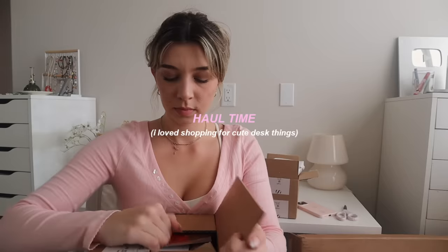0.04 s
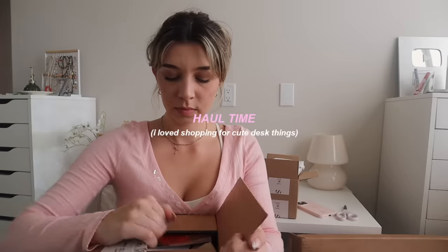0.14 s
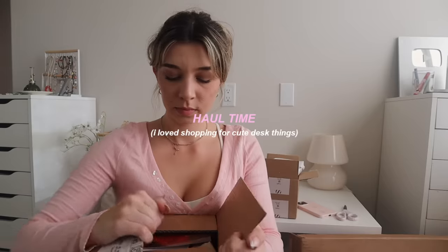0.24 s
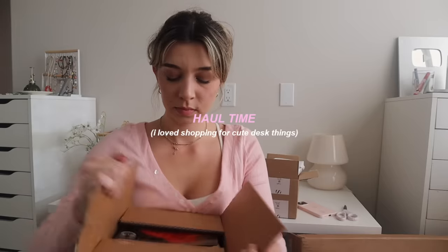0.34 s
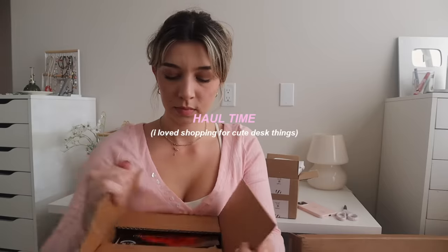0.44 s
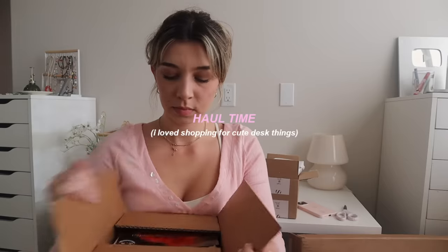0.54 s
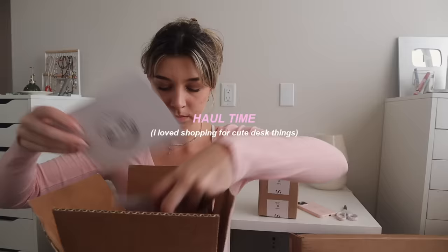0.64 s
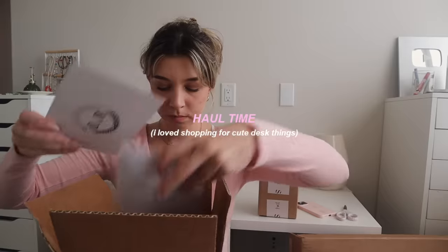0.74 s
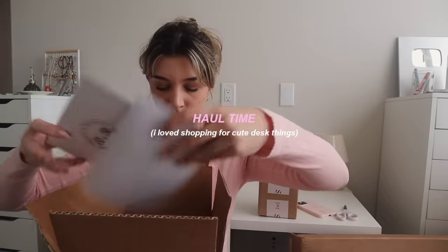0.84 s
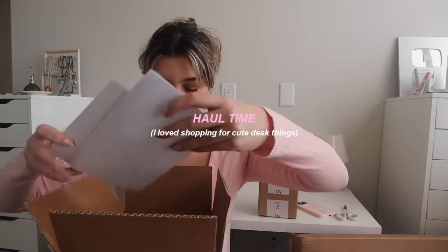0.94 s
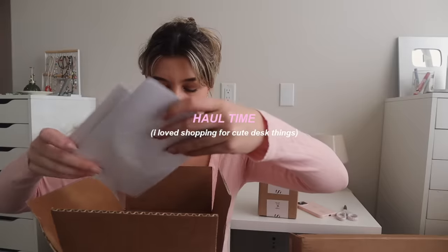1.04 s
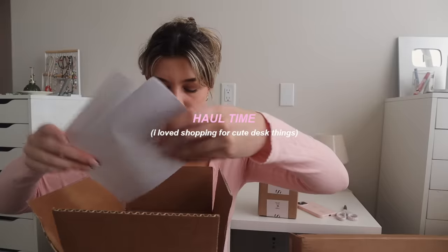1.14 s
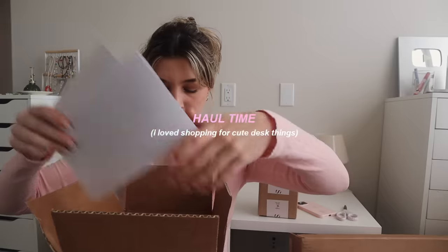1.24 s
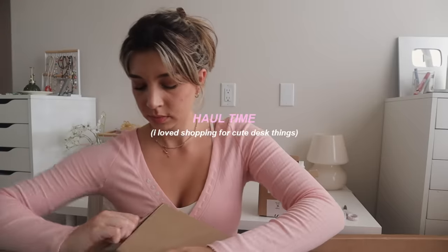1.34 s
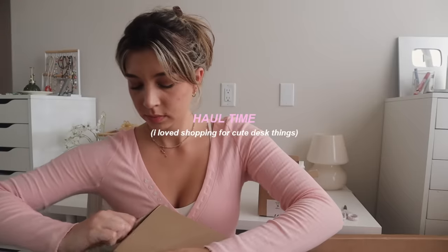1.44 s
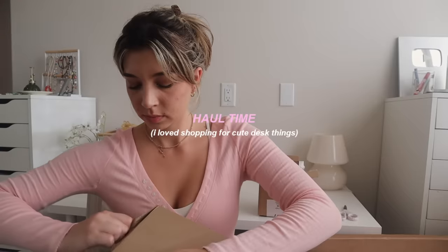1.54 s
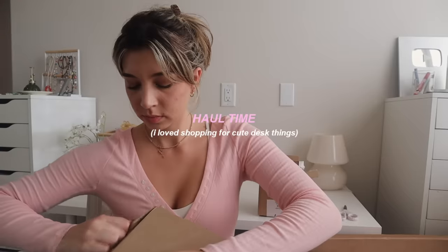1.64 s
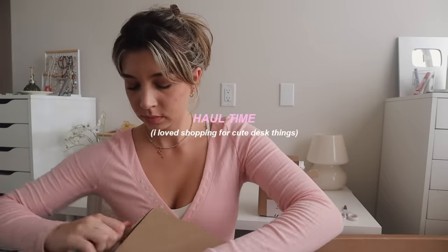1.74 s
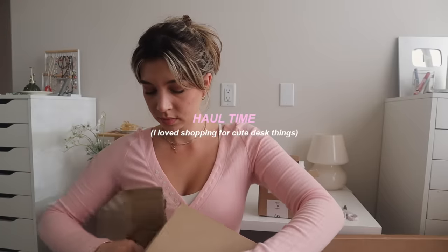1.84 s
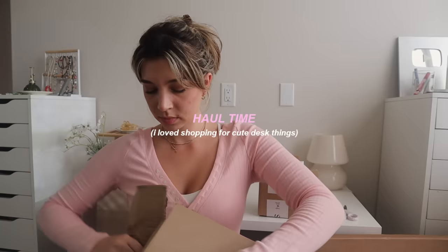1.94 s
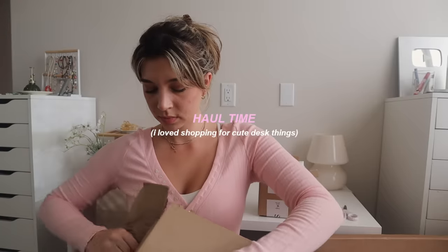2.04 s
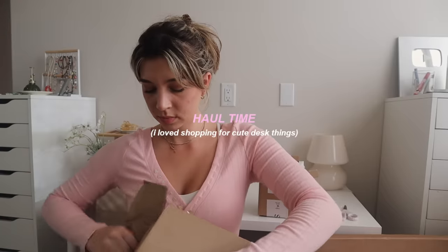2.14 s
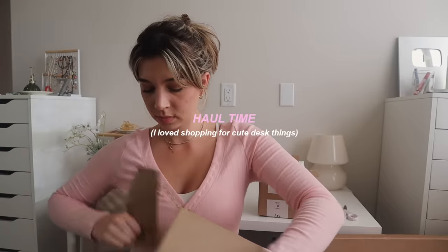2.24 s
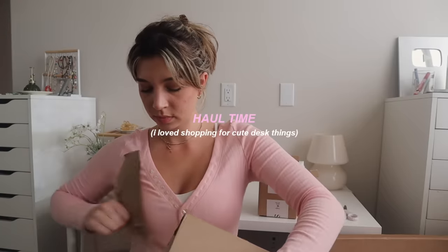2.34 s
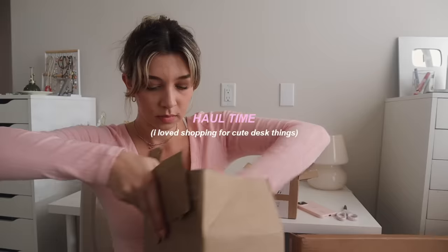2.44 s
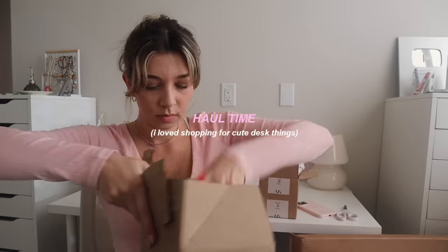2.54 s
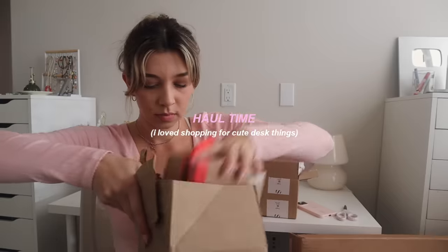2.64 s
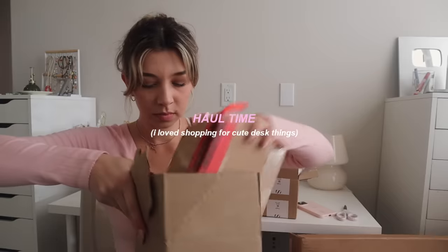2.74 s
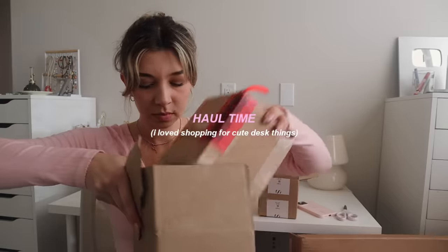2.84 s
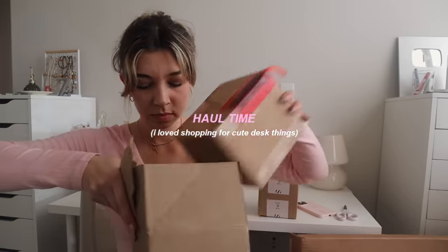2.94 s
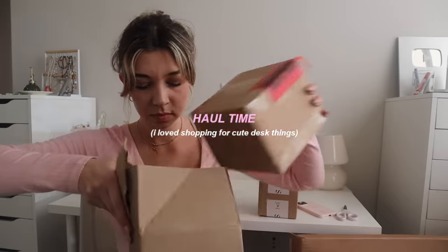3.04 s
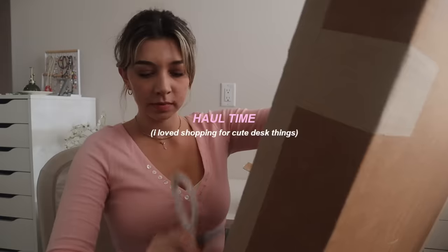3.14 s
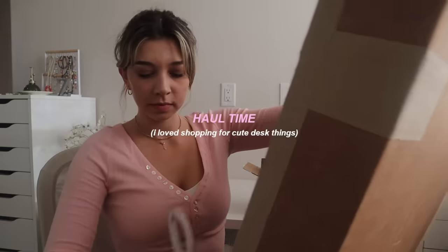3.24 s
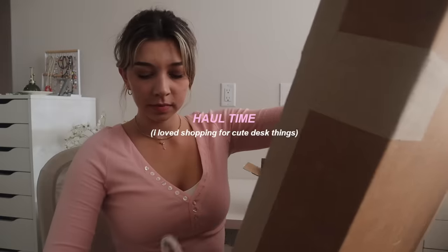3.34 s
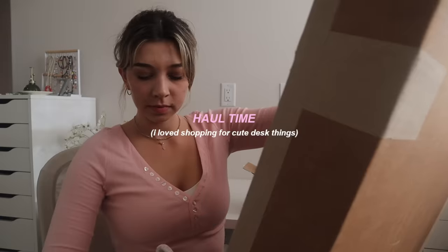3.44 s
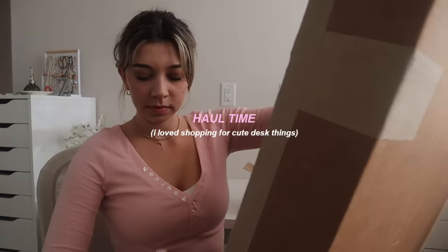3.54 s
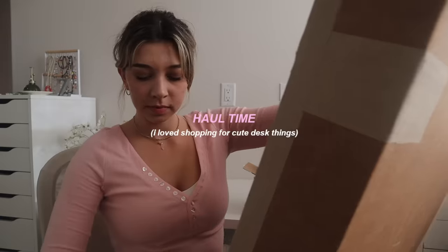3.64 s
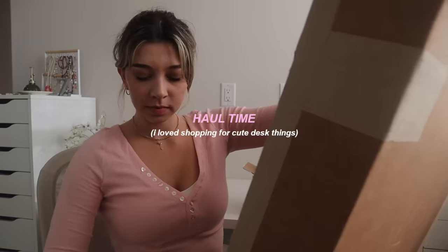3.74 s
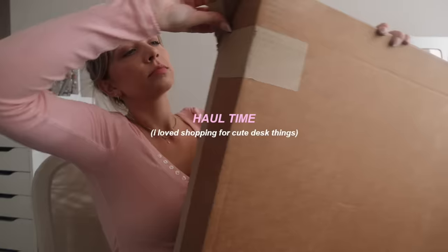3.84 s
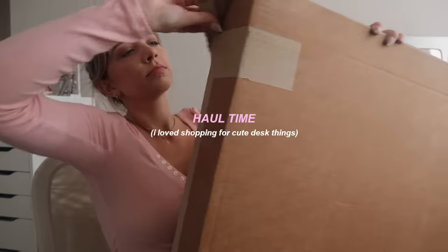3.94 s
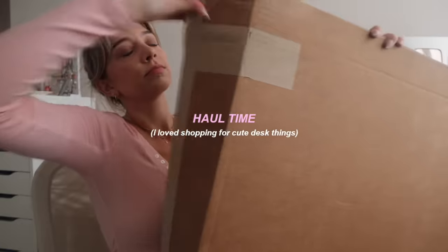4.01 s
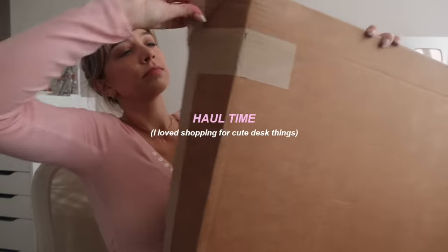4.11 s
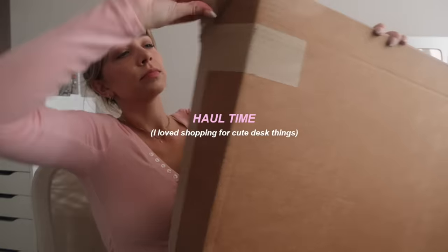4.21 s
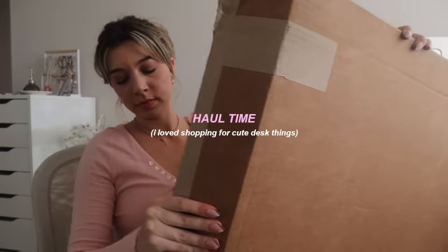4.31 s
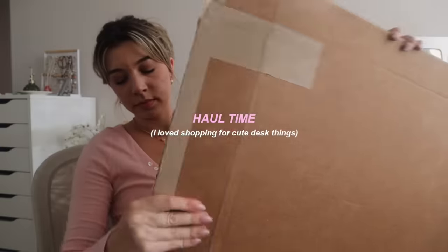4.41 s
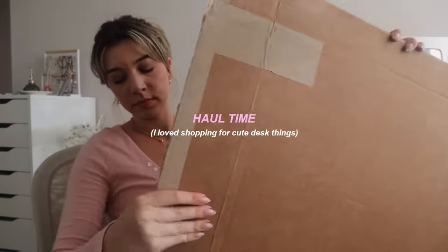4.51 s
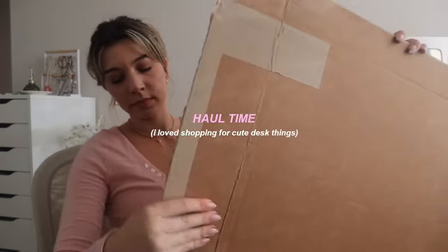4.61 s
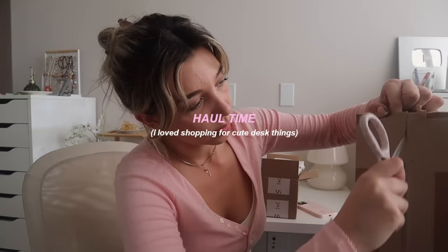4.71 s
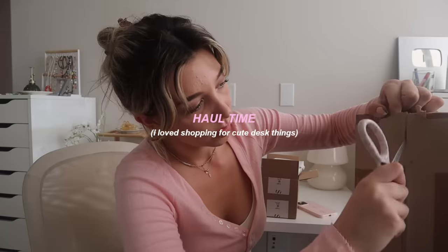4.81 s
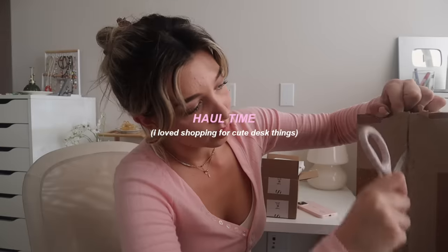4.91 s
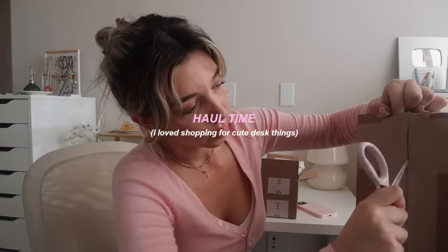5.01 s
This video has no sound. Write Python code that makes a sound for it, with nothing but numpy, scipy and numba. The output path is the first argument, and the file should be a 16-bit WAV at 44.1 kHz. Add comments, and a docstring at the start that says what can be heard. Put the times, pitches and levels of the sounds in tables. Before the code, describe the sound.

Cardboard boxes are knocked, scraped and dragged close to the microphone in a small room, with crackling tape and hard hollow thumps.

```python
"""Cardboard boxes are handled in a small room, close to a stereo microphone, over a steady hush.
Paper is lifted out, a flap is dragged open and a carton is drawn out; a big box slides up on the right,
hands crackle on taped board, and the box is turned round. Edges scrape in dense stick-slip grains, while
knocks ring panel modes, presses boom on two low modes and creases snap in short noise bursts.
A limiter ducks on the hardest knocks, so the room's ring seems to hang on after them."""
import sys
import numpy as np
from scipy import signal
from scipy.fft import rfft, irfft, next_fast_len
from scipy.io import wavfile
from scipy.ndimage import uniform_filter1d
from numba import njit

SR = 44100
rng = np.random.default_rng(int(sys.argv[2]) if len(sys.argv) > 2 else 0)


def digitize_waveform(pressure):
    """Quantize a signal to 16-bit integers and store it at the path in sys.argv[1].

    Rows of a 2-D input are taken as channels; values are limited to [-1, 1].
    """
    field = np.atleast_2d(pressure).T
    bounded = np.clip(field, -1, 1)
    quanta = np.round(bounded * 32767).astype(np.int16)
    wavfile.write(sys.argv[1], SR, quanta)


N = 223651
FFT_SIZE = next_fast_len(N, True)


def undb(db):
    """Decibels to amplitude gain."""
    return 10 ** (np.asarray(db) / 20)


def unit(x):
    """Scale to rms 1."""
    return x / np.sqrt(np.mean(x ** 2))


def on_bins(points, size=FFT_SIZE):
    """Read (frequency [Hz], value) points at every bin of a spectrum, along log frequency."""
    hz, value = np.transpose(points)
    bin_hz = np.fft.rfftfreq(size, 1 / SR) + 1  # 1 Hz up, to keep the log finite
    return np.interp(np.log(bin_hz), np.log(hz), value)


def colour(x, gain):
    """Filter by a gain for every bin."""
    return irfft(rfft(x, FFT_SIZE) * gain, FFT_SIZE)[..., :N]


def walk(rate):
    """Random wander with a spread near 1: straight lines between `rate` random points a second."""
    knots = rng.standard_normal(8192)
    return np.sqrt(1.5) * np.interp(np.arange(N) / SR * rate, np.arange(len(knots)), knots)


def add(track, s, sound):
    """Mix a sound in at time s [s]."""
    i = max(int(s * SR), 0)
    track[:, i:i + sound.shape[-1]] += sound[..., :N - i]


# Colour of the still air: (frequency [Hz], relative level [dB])
HUSH_TONE = [(15, -38), (25, -14.5), (307, -13), (1180, -25), (1410, -25.5), (9100, -38.5), (10900, -32),
             (12100, -82), (22000, -120)]


def hush(level_db=-45):
    """Still air of the room: quiet, steady coloured noise."""
    noise = colour(rng.standard_normal((2, N)), undb(on_bins(HUSH_TONE)))
    return undb(level_db) * unit(noise)


# Reverberation: (frequency [Hz], time to fall by 60 dB [s])
ROOM_DECAY = [(100, 0.31), (400, 0.34), (1500, 0.4), (5000, 0.45), (12000, 0.37)]
# Colour of the reflections; furnishings soak up the treble: (frequency [Hz], relative level [dB])
REFLECTION_TONE = [(70, 6), (200, 4.5), (1000, 6), (2000, 1), (3000, 0), (9000, -1)]


def room(x, wet_db):
    """Direct sound plus diffuse reflections, unrelated in mid and side, each band with its own decay."""
    t = np.arange(SR * 3 // 5) / SR
    noise = rfft(rng.standard_normal((2, len(t)))) * undb(on_bins(REFLECTION_TONE, len(t)))
    hz, t60 = np.transpose(ROOM_DECAY)
    tail = 0
    for share, decay in zip(np.eye(len(hz)), t60):
        band = irfft(noise * on_bins(np.c_[hz, share], len(t)), len(t))
        tail = tail + band * np.exp(-np.log(1000) * t / decay)
    tail = tail * np.clip((t - .002) / 0.00077, 0, 1)  # the nearest surfaces answer after 2 ms
    tail = tail / np.sqrt(np.sum(tail[0] ** 2))
    return x + undb(wet_db) * signal.fftconvolve(x, tail, axes=1)[:, :N]


# Presses on a hollow box:
# (time [s], peak before the room [dB], settled note [Hz], second mode against the first [dB])
PRESSES = [(.334, -4.5, 163.6, -10), (2.608, -20, 129, -7), (2.724, -16.5, 160, -5.5),
           (2.7365, -21.5, 153, -17), (2.914, -23.5, 135, -13), (4.384, -10, 102, -12),
           (4.396, -6, 263.5, -9), (4.741, -7.5, 202, -27), (4.802, -19, 100, -7), (4.953, -12, 203, -25)]


def booms(swell_s=0.0012, bend=0.057, relax_s=0.022, mode_ratio=2.3, t60_s=0.13):
    """Pressing on a hollow box sets its face swinging on two low modes that sink as it relaxes."""
    out, t = np.zeros((2, N)), np.arange(SR // 3) / SR
    for s, peak_db, note_hz, second_db in PRESSES:
        hz = note_hz * (1 + bend * np.exp(-t / relax_s))  # starts sharp by a share of its note
        phase = 2 * np.pi * np.cumsum(hz) / SR
        modes = np.exp(1j * phase) + undb(second_db) * np.exp(1j * mode_ratio * phase)
        swing = modes * (1 - np.exp(-t / swell_s)) * np.exp(-np.log(1000) * t / t60_s)
        add(out, s, undb(peak_db) * np.array([swing.imag, swing.real]) / np.abs(swing).max())
    return room(out, wet_db=-4.5)


def snap(level_db, hz, decay_ms, octaves):
    """Fibres give way in a burst of a few milliseconds, spread evenly over its band."""
    t = np.arange(SR // 25) / SR
    edges = [hz / 2 ** (octaves / 2), min(hz * 2 ** (octaves / 2), .45 * SR)]
    fade = np.exp(-t * 1000 / decay_ms)
    spectrum = rfft(rng.standard_normal((2, len(t))) * fade)
    even = irfft(np.exp(1j * np.angle(spectrum)), len(t))  # keep the phases, flatten the spectrum
    burst = signal.lfilter(*signal.butter(2, edges, "band", fs=SR), even * fade ** .25)
    # equal energy for equal level and decay, however wide the band
    return .5 * undb(level_db) * burst * np.linalg.norm(fade) / np.linalg.norm(burst, axis=1, keepdims=True)


# Snaps of creases, paper and fingernails:
# (time [s], relative level [dB], centre [Hz], nominal decay constant [ms], width [octaves])
CREASES = [(0.3288, 10.5, 1380, 1.4, 1.5), (0.3279, 11.5, 5200, 1.44, 2.2), (.826, -17, 1750, 2, .5),
           (.854, -28, 3960, 3, 2.5), (.9304, -1.5, 2310, 0.72, 3.16), (1.128, -14, 1350, 3.7, 2.1),
           (1.3317, -4.5, 4200, 1.07, 3.2), (1.891, -19, 1830, 5.9, 1.7), (1.905, -1.5, 1280, 1.2, 2),
           (1.932, -9.5, 1210, 2.6, 0.58), (4.0155, 8, 1680, 3.7, 0.66), (4.04, 10.5, 2870, 1.2, 1.5),
           (4.383, 0.5, 1790, 1.04, 2.84), (4.733, -14, 3180, 4.5, 1.04), (4.95, -16, 4000, 8.8, 2.5),
           (4.984, -4, 2180, 1.8, 1.95)]


def snaps():
    """Creases give way; stiff card rings in a narrow band, paper in a wide one."""
    out = np.zeros((2, N))
    for s, level_db, hz, decay_ms, octaves in CREASES:
        add(out, s, snap(level_db, hz, decay_ms, octaves))
    return room(out, wet_db=-5.0)


# Modes of a box panel at pitch 1: (frequency [Hz], relative level [dB], time to fall by 60 dB [s])
PANEL_MODES = [(104, -14.5, 0.19), (157, -8, 0.134), (214, 2.5, 0.078), (269.3, -10.5, 0.32),
               (316, -1.5, 0.062), (378, 12, 0.029), (489, 10, 0.024), (585, -10, 0.21), (810, -0.5, 0.045),
               (1075, -9, 0.038), (1450, 2.5, 0.037)]
# Knocks on a panel:
# (time [s], peak before leak and room [dB], contact time scale [ms], pitch of the panel [ratio])
BLOWS = [(.001, -15, 0.77, 0.72), (0.3283, 14, 1.08, 1.08), (.3365, 1, 1.8, .75), (.439, -7.5, 1.3, 0.97),
         (.676, -18, 1.3, 0.87), (0.9327, -14.5, 0.15, 0.92), (1.331, -19.5, 0.61, 1.37),
         (1.481, -24, 0.67, 1.03), (1.492, -20, 1.6, 1.4), (1.7727, -12, 0.56, 1.11),
         (2.217, -14, 2.3, 0.75), (2.225, -6.5, 0.91, 1.05), (2.607, -21.5, 2, 1.14),
         (2.7235, -15, 1.2, 0.75), (2.7366, -14.5, 3.9, 0.65), (2.913, -20, 0.8, 1.36),
         (3.146, -13.5, 1.6, 0.43), (3.231, -7.5, 1.5, 1.25), (3.808, -10.5, 4.4, 1.28),
         (3.919, -19.5, 2.3, 1.53), (4.016, 4.5, 0.85, 1.37), (4.0224, 9.5, 1.6, 1.11),
         (4.0398, 13, 1.7, 1.35), (4.3837, 10.5, 2.25, 1.2), (4.392, 11.5, 1.36, 1.21),
         (4.682, -19, 0.87, 1.14), (4.733, -14, 0.97, 1.55), (4.984, -9.5, 1.1, 1.13)]


def knocks(crunch_db=13, crunch_s=0.014, leak_hz=130):
    """Each blow rings the panel and crushes its flutes; a longer, softer contact leaves only the low modes."""
    out, t = np.zeros((2, N)), np.arange(SR // 4) / SR
    hz, db, t60 = np.transpose(PANEL_MODES)[:, :, None]
    for s, peak_db, contact_ms, pitch in BLOWS:
        swing = np.exp((2j * np.pi * hz * pitch - np.log(1000) / t60) * t)
        modes = np.sum(undb(db) * swing, axis=0)
        crunch = undb(crunch_db) * rng.standard_normal((2, len(t))) * np.exp(-t / crunch_s)
        crunch_low_hz = 2 * PANEL_MODES[2][0] * pitch  # an octave above the third mode
        crunch = signal.lfilter(*signal.butter(2, crunch_low_hz, "high", fs=SR), crunch)
        age = t * 1000 / contact_ms
        push = age * np.exp(-2 * np.pi * age)
        struck = np.array([modes.real, modes.imag]) + crunch
        thud = signal.fftconvolve(struck, push[None], axes=1)[:, :len(t)]
        add(out, s, undb(peak_db) * thud / np.abs(thud[0]).max())
    # the lowest notes leak round the panel
    out = signal.sosfilt(signal.butter(2, leak_hz, "high", fs=SR, output="sos"), out)
    return room(out, wet_db=-5.0)


def pressure(strokes, levels_db, fade_db_per_s, sag_db_per_s=6.5):
    """Each stroke rises, sags as the hand eases off, then dies away; overlapping strokes add in power."""
    power, age = np.zeros((1, N)), np.arange(SR * 3 // 4) / SR
    for (s, rise_s, hold_s, *_), db in zip(strokes, levels_db):
        sag_db = sag_db_per_s * np.maximum(age - rise_s, 0)
        fade_db = fade_db_per_s * np.maximum(age - rise_s - hold_s, 0)
        add(power, s, (np.minimum(age / rise_s, 1) * undb(db - sag_db - fade_db)) ** 2)
    return np.sqrt(power[0])


def rub(strokes, tone, peaks, slip_rate, grain_db, chatter_rate, chatter_db, wet_db, fade_db_per_s):
    """Fibres catch and slip in bunches; the grains ring the board, which booms below and hisses above."""
    f = np.fft.rfftfreq(FFT_SIZE, 1 / SR) + 1
    sizes = undb(grain_db * np.minimum(rng.exponential(size=N), 4))
    slips = (rng.random(N) < slip_rate / SR) * sizes  # slip_rate in slips per second
    bunching = undb(chatter_db * np.minimum(walk(chatter_rate), 1.5))
    grains = slips * rng.standard_normal((2, N)) * bunching
    ring = 1 + sum(undb(db) / (1 + 1j * (f / hz - hz / f) * hz / width) for hz, width, db in peaks)
    board = colour(room(grains, wet_db), undb(on_bins(tone)) * ring)
    level_db, boom_db, hiss_db = np.transpose(strokes)[3:]
    low, high = 1 / (1 + (f / 350) ** 6), 1 / (1 + (2500 / f) ** 6)
    out = 0
    for band, rel_db in ((low, boom_db), (1 - low - high, 0), (high, hiss_db)):
        part = colour(board, band)
        out = out + part / np.std(part[0]) * pressure(strokes, level_db + rel_db, fade_db_per_s)
    return out


def fibres(strokes, rate, level_db, spread_db, centre_hz, octaves, cycles, fade_db_per_s=300):
    """Single fibres snap at random during a scrape, each with its own size, pitch and side."""
    out, t = np.zeros((2, N)), np.arange(SR // 200) / SR
    force = pressure(strokes, np.transpose(strokes)[3], fade_db_per_s)
    start, end = strokes[0][0], sum(strokes[-1][:3])
    for when, size, pitch, side in rng.random((int(rate * (end - start)), 4)):
        s, hz = start + when * (end - start), centre_hz * 2 ** (octaves * (pitch - .5))
        tick = np.sin(2 * np.pi * hz * t) * np.exp(-hz * t / cycles) * force[int(s * SR)]
        tick_db = level_db + spread_db * (size ** 2 - 1)
        add(out, s, undb(tick_db) * np.outer([1, 2 * side - 1], tick))
    return room(out, wet_db=-9)


def flex(x, curve, width_hz, lift_db, wander):
    """A resonance whose centre follows the bend of the board and wavers by a share of itself."""
    hz = np.interp(np.arange(N) / SR, *np.transpose(curve)) * (1 + wander * walk(30))
    turn = np.exp(2j * np.pi * np.cumsum(hz) / SR)
    pole = np.exp(-np.pi * width_hz / SR)
    # shift the centre down to 0 Hz, smooth there, and shift back
    ring = turn * signal.lfilter([1 - pole], [1, -pole], x / turn)
    return x + 2 * undb(lift_db) * ring.real


def judder(bursts, tone, slip_rate, jitter, grain_share, release_ms, wet_db):
    """A surface lets go in a quick, uneven run of sharp slips, a few milliseconds long."""
    force, ms = np.zeros((1, N)), np.arange(SR // 25) / SR * 1000
    for s, db, length_ms in bursts:
        add(force, s, undb(db) * np.exp(-np.maximum(ms - length_ms, 0) / release_ms))
    phase = np.cumsum(slip_rate * np.exp(jitter * walk(500))) / SR % 1
    # each slip decays by a share of its own cycle
    slips = unit(np.exp(-phase / grain_share) * rng.standard_normal((2, N)))
    return room(colour(slips * force, unit(undb(on_bins(tone)))), wet_db)


# Strokes of rubbed paper; all stroke tables share these columns:
# (time [s], rise [s], hold [s], level [dB], boom against level [dB], edge hiss against level [dB])
PAPER_STROKES = [(.33, 0.072, 0.021, -26.5, -1.5, -15), (.5, 0.015, 0.14, -45.5, 2, -4),
                 (.672, 0.0095, 0.017, -38.5, 4.5, -4), (.71, 0.064, 0.02, -45.5, -1, 4),
                 (.85, 0.0026, 0.0061, -42.5, 6, 7.5), (.93, 0.025, 0.55, -55.5, -10, 14),
                 (1.17, 0.1, 0.019, -57.5, 0, 18.5), (1.333, 0.026, 0.12, -48, -10, -5),
                 (1.474, 0.0047, 0.014, -36.5, 1.5, 3.5), (1.53, 0.03, 0.023, -38.5, 3, 1)]
# Colour of rubbed paper: (frequency [Hz], relative level [dB])
PAPER_COLOUR = [(50, -54), (314, -34.5), (475, -24.5), (751, -20), (10300, -41.5), (12100, -37),
                (15700, -37.5), (22000, -120)]


def paper():
    """Paper lifted out: its fibres slip in soft, slowly bunching grains."""
    return rub(PAPER_STROKES, PAPER_COLOUR, [], slip_rate=6000, grain_db=2, chatter_rate=27,
               chatter_db=-2.5, wet_db=-4, fade_db_per_s=186.0)


# Strokes of the flap:
# (time [s], rise [s], hold [s], level [dB], boom against level [dB], edge hiss against level [dB])
FLAP_STROKES = [(1.897, 0.024, 0.12, -28.5, -14, -3), (1.96, 0.073, 0.084, -26, -7, -1.5),
                (2.155, 0.076, 0.061, -19, -5, -2.5), (2.435, 0.014, 0.029, -31, -2.5, -5.5)]
# Colour of the flap's rubbing: (frequency [Hz], relative level [dB])
FLAP_COLOUR = [(50, -40), (95, -15), (198, -8), (329, -2.5), (423, -6), (750, -8), (2020, -15), (2480, -12),
               (10500, -17.5), (12100, -11), (15700, -45), (22000, -120)]
# Resonances that the flap's edge drives: (frequency [Hz], width [Hz], added ring [dB])
FLAP_RESONANCES = [(250, 34, -8), (355, 65, -8), (1920, 510, 2.5)]
# Ring that shifts as the flap bends under the hand: (time [s], centre before wavering [Hz])
FLAP_BEND = [(1.9, 1340), (2.05, 1040), (2.2, 980), (2.24, 1550), (2.4, 1020)]


def flap(side_db=-1.5):
    """A flap dragged open straight ahead, so narrowed: grains and snapping fibres ring the bending board."""
    scrape = rub(FLAP_STROKES, FLAP_COLOUR, FLAP_RESONANCES, slip_rate=7000, grain_db=0.0,
                 chatter_rate=140, chatter_db=1.5, wet_db=-4.5, fade_db_per_s=154)
    ticks = fibres(FLAP_STROKES, rate=450, level_db=9.5, spread_db=15, centre_hz=2750, octaves=2.7, cycles=1.4)
    bent = flex(scrape + ticks, FLAP_BEND, width_hz=330, lift_db=-0.5, wander=0.19)
    return bent * undb([[0], [side_db]])


# Strokes of the carton:
# (time [s], rise [s], hold [s], level [dB], boom against level [dB], edge hiss against level [dB])
CARTON_STROKES = [(2.52, 0.01, 0.064, -38.5, 1, -9.5), (2.6, 0.016, 0.079, -36.5, 4.5, -8.5),
                  (2.73, 0.015, 0.075, -38.5, -7, 0), (2.795, 0.0099, 0.011, -35.5, -3, -22),
                  (2.9, 0.071, 0.013, -36, -0.5, -4)]
# Colour of sliding board, for carton, taped board and big box: (frequency [Hz], relative level [dB])
BOARD_COLOUR = [(29, -52), (50, -25), (107, -7), (154, -17.5), (228, -4.5), (307, -8), (453, -8),
                (2210, -17), (4200, -20), (9610, -18.5), (12100, -20), (15700, -17), (22000, -120)]
# Ring that shifts as the carton bends under the hand: (time [s], centre before wavering [Hz])
CARTON_BEND = [(2.61, 296), (2.65, 467), (2.7, 424), (2.74, 326), (3, 280)]


def carton():
    """A carton drawn out: sliding grains drive one narrow ring that follows the bend."""
    scrape = rub(CARTON_STROKES, BOARD_COLOUR, [], slip_rate=6000, grain_db=-3.0, chatter_rate=55,
                 chatter_db=3.0, wet_db=-5.0, fade_db_per_s=181)
    return flex(scrape, CARTON_BEND, width_hz=29, lift_db=4, wander=0.042)


# Strokes of hands on taped board:
# (time [s], rise [s], hold [s], level [dB], boom against level [dB], edge hiss against level [dB])
GRAB_STROKES = [(3.954, 0.029, 0.003, -23, -1.5, 4), (4.03, 0.016, 0.12, -24, -3, -24.5),
                (4.315, 0.0086, 0.078, -37, 7.5, -10), (4.4, 0.032, 0.077, -34, 10.5, -8.5)]
# Resonances of the taped board: (frequency [Hz], width [Hz], added ring [dB])
TAPE_RESONANCES = [(535, 240, 1.5), (1960, 520, 5.5), (3850, 780, 2)]
# Crackles of packing tape under the fingers: (time [s], relative level [dB], length before release [ms])
TAPE_CRACKLES = [(3.953, -27.5, 3), (3.967, -18, 2.5), (3.9745, -12, 1.5), (3.9773, -5, 1.8),
                 (3.9833, -4, 2), (3.9995, -16, 1), (4.0012, -6, 1.1), (4.0153, -4, 3.1), (4.0205, 0, 2.7)]
# Colour of the crackles: (frequency [Hz], relative level [dB])
CRACKLE_COLOUR = [(200, -9), (1000, -18), (1800, 1.5), (2600, -2.5), (5000, -3.5), (8000, -1.5),
                  (11000, -5), (14000, -9), (22000, -55)]


def taped_board():
    """Hands rub taped board in coarse, fast-chattering grains, and the tape lets go in crackles."""
    scrape = rub(GRAB_STROKES, BOARD_COLOUR, TAPE_RESONANCES, slip_rate=3500, grain_db=3.5,
                 chatter_rate=550, chatter_db=5.5, wet_db=2.5, fade_db_per_s=106)
    crackle = judder(TAPE_CRACKLES, CRACKLE_COLOUR, slip_rate=1400, jitter=.4, grain_share=1.0,
                     release_ms=0.79, wet_db=-12.5)
    return scrape + crackle


# Strokes of the big box sliding up, then being turned round:
# (time [s], rise [s], hold [s], level [dB], boom against level [dB], edge hiss against level [dB])
SLIDE_STROKES = [(3.108, 0.0078, 0.014, -35, 2, 1), (3.143, 0.005, 0.16, -28, 2.5, -2),
                 (3.27, 0.065, 0.078, -28, 3, -1), (3.399, 0.034, 0.035, -29.5, -0.5, -4),
                 (3.48, 0.0072, 0.12, -37, -0.5, -5.5), (3.573, 0.065, 0.071, -24, -1, -4.5),
                 (3.72, 0.013, 0.029, -31.5, 5.5, -5), (3.769, 0.0039, 0.0083, -24, 1.5, -3.5)]
TURN_STROKES = [(4.56, 0.04, 0.31, -41, -10, -26), (4.678, 0.062, 0.0075, -22.5, -4.5, -12),
                (4.75, 0.037, 0.02, -29.5, 0, -27), (4.85, 0.069, 0.017, -34, -6, -18),
                (4.932, 0.017, 0.01, -21.5, -3, -6), (4.985, 0.007, 0.044, -26.5, 2, -13.5)]
# Colour of the turning box: (frequency [Hz], relative level [dB])
TURN_COLOUR = [(29, -31), (50, -9), (217, -3), (1220, -20), (1880, -18.5), (3050, -16), (10500, -13.5),
               (12100, -10), (15700, -59), (22000, -120)]
# Resonances of the big box: (frequency [Hz], width [Hz], added ring [dB])
BOX_RESONANCES = [(210, 140, -8.5), (408, 34, -8.5), (690, 440, -7.5), (1850, 280, -3), (4440, 1800, 0)]
# Catches of the sliding edge on the corrugation:
# (time [s], relative level [dB], length before release [ms])
EDGE_CATCHES = [(3.1455, -22.5, 2.6), (3.162, -22.5, 6.5), (3.171, -27.5, 7), (3.2005, -21, 3),
                (3.2065, -20, 1.8), (3.2115, -18, 2.1), (3.2305, -21, 3.7), (3.247, -20, 4.2),
                (3.27, -19, 9.1), (3.292, -22, 8.6), (3.3465, -18.5, 1.6), (3.383, -23, 2.9),
                (3.408, -29, 2.5), (3.667, -26, 1.7), (3.773, -29, 6.2), (3.795, -31, 11)]
# Colour of the catches: (frequency [Hz], relative level [dB])
CATCH_COLOUR = [(300, -30), (1500, -8), (3200, -5), (4100, 5.5), (5800, -1), (7500, -9.5), (10500, -3),
                (13000, -50), (22000, -73)]


def big_box():
    """A big box slides up, its edge juddering on the corrugation and snapping fibres, and is turned round."""
    scrape = rub(SLIDE_STROKES, BOARD_COLOUR, BOX_RESONANCES, slip_rate=8000, grain_db=0.0,
                 chatter_rate=160, chatter_db=2.5, wet_db=-3.5, fade_db_per_s=356.0)
    ticks = fibres(SLIDE_STROKES, rate=220, level_db=11, spread_db=15, centre_hz=4600, octaves=1.8, cycles=1.9)
    catches = judder(EDGE_CATCHES, CATCH_COLOUR, slip_rate=950, jitter=0.78, grain_share=0.48,
                     release_ms=2.1, wet_db=-6.5)
    turning = rub(TURN_STROKES, TURN_COLOUR, BOX_RESONANCES, slip_rate=6500, grain_db=1.0,
                  chatter_rate=200, chatter_db=4.5, wet_db=-0.5, fade_db_per_s=167)
    return scrape + ticks + catches + turning


# Gain of the side signal; the microphone widens the treble: (frequency [Hz], gain [dB])
SIDE_GAIN = [(60, -34), (150, -27), (300, -18), (600, -9), (1200, -4), (2500, 1), (5000, 3), (9000, 6)]


def place(x, pan_db):
    """Turn mid and side into left and right; pan_db is the gain of left over right."""
    mid, side = x[0], colour(x[1], undb(on_bins(SIDE_GAIN)))
    return np.array([mid + side, mid - side]) * unit(undb([[pan_db], [0]]))


def scene():
    """Handling in front of the microphone, the big box to its right."""
    front = hush() + booms() + snaps() + knocks()
    front = front + paper() + flap() + carton() + taped_board()
    return place(front, pan_db=0.48) + place(big_box(), pan_db=-1.5)


@njit
def limiter_db(over_db, attack, release):
    """Gain reduction that follows overloads quickly and recovers at a steady rate in dB."""
    out, cut = np.empty(len(over_db)), 0.
    for i in range(len(over_db)):
        if over_db[i] > cut:
            cut += attack * (over_db[i] - cut)
        else:
            cut = max(cut - release, 0.)
        out[i] = cut
    return out


def record(dry, mic_hz=11200, ceiling_db=-9, attack_s=0.0011, recovery_db_per_s=115, top_hz=16000):
    """The microphone rolls off both ends; the limiter follows the mid's power and lets short peaks clip."""
    x = signal.sosfilt(signal.butter(10, min(mic_hz, .45 * SR), fs=SR, output="sos"), dry)
    x = signal.sosfilt(signal.butter(2, 25, "high", fs=SR, output="sos"), x)
    power = uniform_filter1d(x.mean(axis=0) ** 2, size=110)  # averaged over 2.5 ms
    over_db = 10 * np.log10(np.abs(power) + 1e-12) - ceiling_db
    x = x * undb(-limiter_db(over_db, 1 / (attack_s * SR), recovery_db_per_s / SR))
    clipped = np.clip(x, -1, 1)
    return signal.sosfilt(signal.ellip(8, .2, 70, top_hz, fs=SR, output="sos"), clipped)


dry = scene()
out = record(dry)
digitize_waveform(out)
```